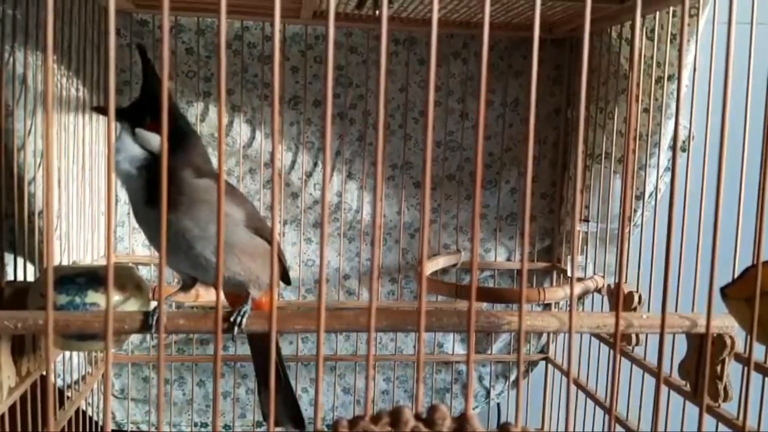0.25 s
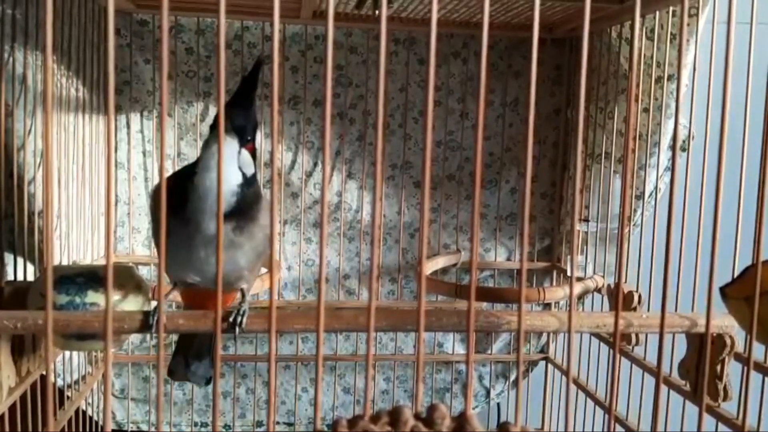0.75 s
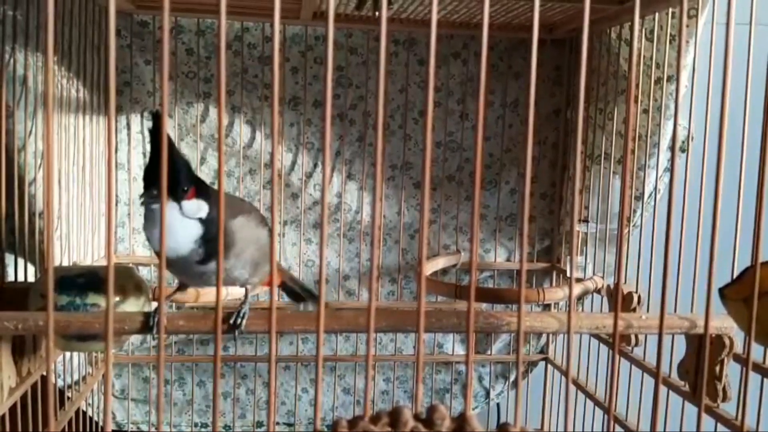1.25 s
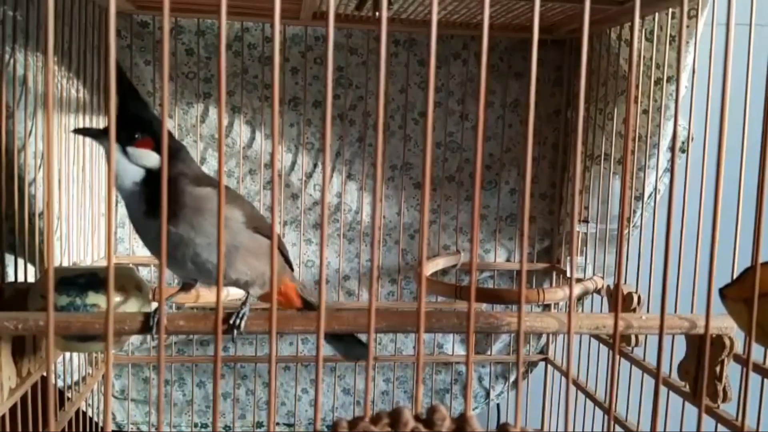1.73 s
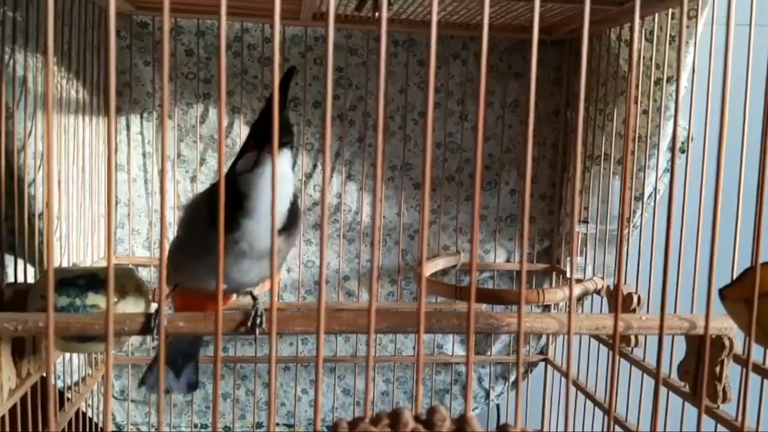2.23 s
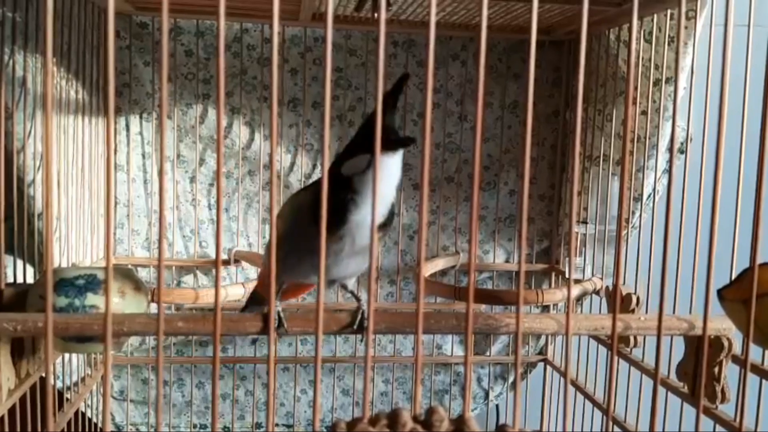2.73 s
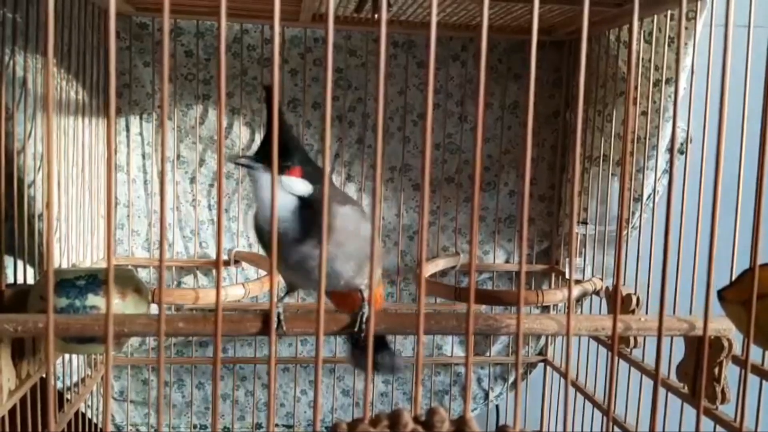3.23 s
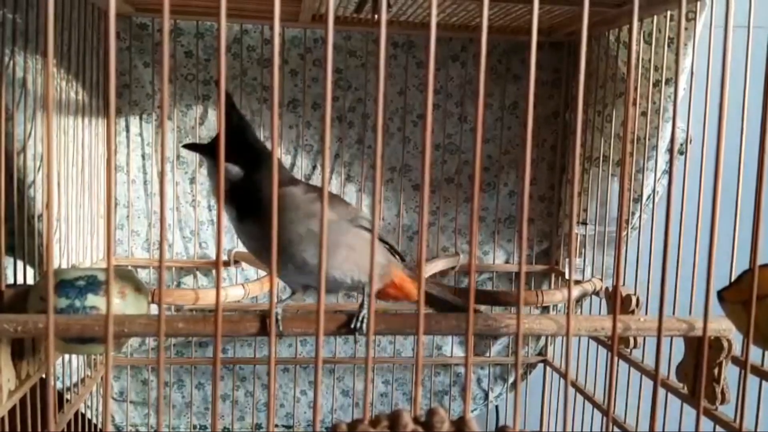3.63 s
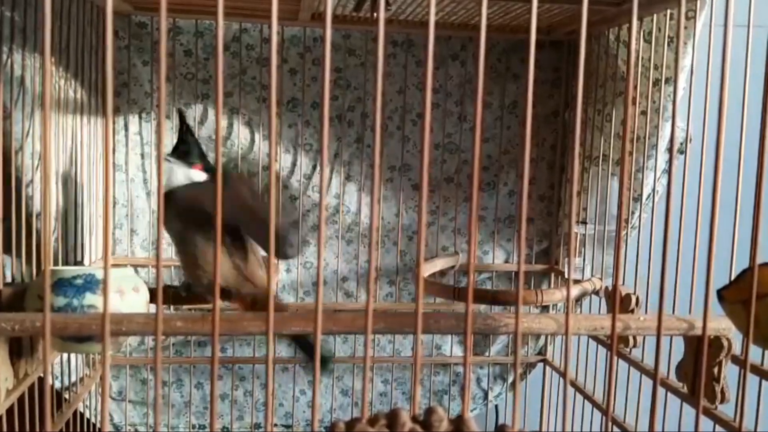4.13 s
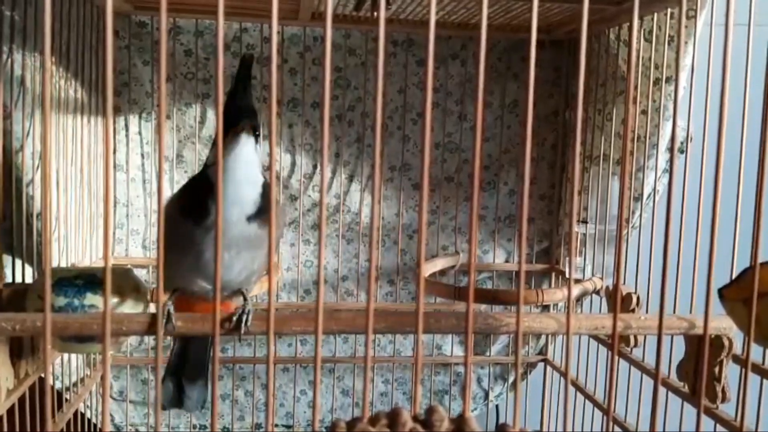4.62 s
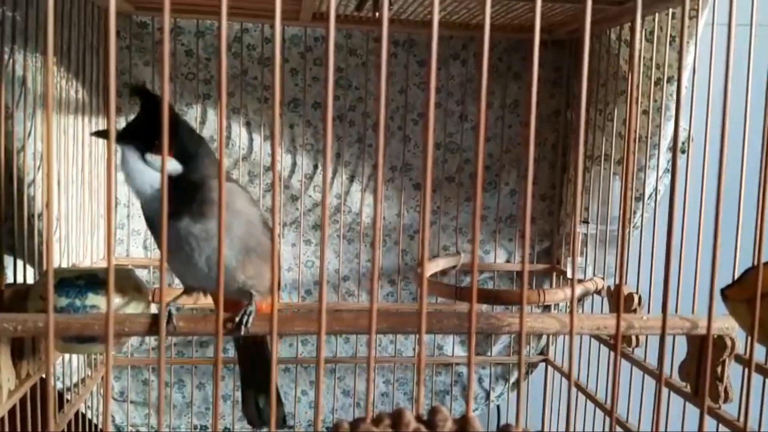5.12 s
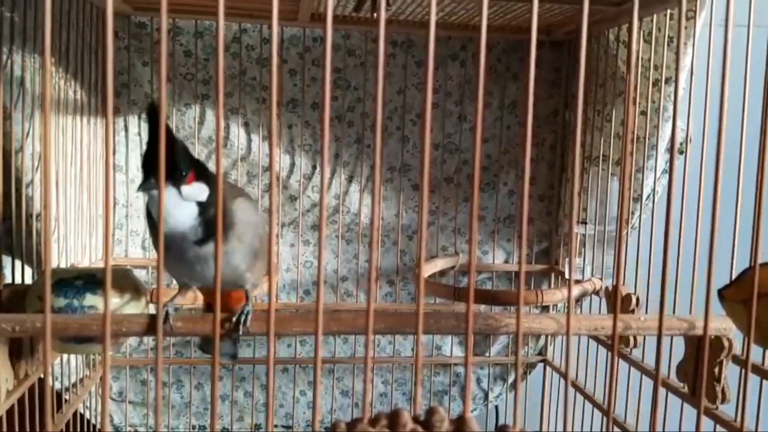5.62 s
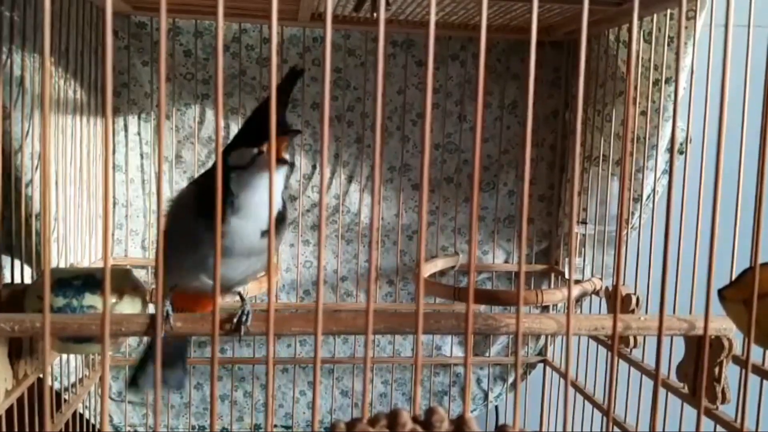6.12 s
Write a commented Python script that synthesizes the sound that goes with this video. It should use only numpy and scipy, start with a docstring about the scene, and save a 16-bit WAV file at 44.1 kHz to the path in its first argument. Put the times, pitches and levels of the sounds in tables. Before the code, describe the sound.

Inside a hard-walled room, a caged bulbul sings close to the microphone, slightly right of centre. It starts immediately with a loud, clipped note, a buzzy rising whit and weaker falling notes until 0.3 s. Faint distant chirps follow at 0.5-1.05 s. A smooth hooked call, stepping up and plunging, comes at 1.3 s, with soft feather rustles and dull far sounds around it. At 1.95-2.45 s a loud whit leads into a quick descending warble; another hooked call sounds at 3.0 s. From 3.5 to 4.45 s distant birds chirp busily, with two hoarse chucks and short wing flutters near 3.8-4.2 s. A strong whit at 4.55 s opens a rapid tumbling phrase lasting to 5.1 s. Sparse faint chirps follow, then bright whistles at 5.9 s, a whit at 6.15 s and a last note at 6.3 s. Echoes and narrow ringing trail each phrase over quiet room noise, low hum and hiss.

```python
"""In a hard-walled room, a red-whiskered bulbul sings short, loud phrases in a cage close to the microphone.
Its notes are gliding whistles with weak overtones, some with a fast buzz; wall echoes, a dense tail and narrow
resonances ring on after them. Other birds answer from further off with small chirps and hoarse chucks, heard
largely through the room. Wings and feet make grainy puffs of noise, and far sounds are dull, dying bands of noise.
Below lie room noise, a wavering low hum, a thin high tone and a treble hiss."""
import sys
import numpy as np
from scipy import signal
from scipy.fft import rfft, irfft
from scipy.io import wavfile
from scipy.ndimage import uniform_filter1d, minimum_filter1d

SR = 44100
rng = np.random.default_rng(int(sys.argv[2]) if len(sys.argv) > 2 else 0)


def generate_wav(sig):
    """Save sig (samples, or channels by samples) to the path in sys.argv[1] as 16-bit PCM at SR."""
    pcm = np.round(np.clip(np.atleast_2d(sig).T, -1, 1) * 32767).astype(np.int16)
    wavfile.write(sys.argv[1], SR, pcm)


N = 280476

# Room noise colour: [f/Hz, relative level per Hz/dB]
ROOM_NOISE_COLOUR = [(25, -19), (60, -9.5), (120, -5.5), (170, -6.5), (220, -21.5), (330, -7), (800, -18.5),
                     (1500, -18), (3300, -13.5), (5500, -21), (8000, -30.5)]
# Room noise loudness: [t/s, level/dB]
ROOM_NOISE_LEVEL = [(0, -52), (.7, -61.5), (1.5, -54.5), (2.5, -61), (3.9, -57), (5.3, -60.5),
                    (6.36, -62.5)]
# Treble hiss colour: [f/Hz, relative level per Hz/dB]
TREBLE_HISS_COLOUR = [(7500, -31.5), (9500, -20.5), (10800, 13), (11800, 3), (13000, -12.5), (16000, -23.5)]
# Low hum, before it wavers: [t/s, level/dB]
HUM_LEVEL = [(0, -73.5), (2.4, -77), (2.8, -68), (5.2, -71.5), (5.7, -64), (6.36, -63)]
# Thin high tone, before it flickers: [t/s, peak level/dB]
WHINE_LEVEL = [(0, -53), (.6, -61.5), (1.2, -76), (1.6, -58), (2.5, -65.5), (2.95, -57.5), (3.15, -80.5),
               (6.36, -84)]
# Held notes of the warble: [t/s, length/s, start f/Hz, end f/Hz, source level/dB, swell over the note/dB,
# scoop up into it/s, drop out of it/s]
HELD_NOTES = [ (0, .019, 2320, 2382, -6.5, -17.5, 0.0028, 0.0011),
              (0.121, 0.031, 2034, 1898, -23.5, 13, 0.00074, 0.0017),
              (0.158, 0.021, 1612, 1738, -29.5, -9, .009, 0.0047),
              (0.231, 0.066, 1550, 1404, -31.5, -9, 0.0022, 0.00088),
              (2.286, 0.021, 3086, 2907, -12, 3, 0.0012, 0), (2.308, 0.016, 2687, 2585, -14.5, 3, 0, 0),
              (2.329, .024, 1998, 1954, -17.5, 2, 0, 0.00024),
              (2.407, 0.045, 1689, 1512, -25, -6, 0.0032, 0.0018),
              (4.918, .023, 2690, 2727, -17.5, 15.5, 0.017, 0),
              (4.938, 0.017, 3200, 3075, -5, -1.5, 0, 0.0022),
              (5.005, 0.027, 1668, 1700, -24, 3.5, 0.018, 0.00028),
              (5.031, 0.039, 2382, 2699, -19, 6.5, 0.0017, 0),
              (5.065, .017, 2396, 2358, -15, 10, 0.00073, 0), (5.087, 0.021, 1862, 1685, -22.5, -8.5, 0, 0),
              (5.107, 0.012, 2107, 1995, -26, 4, 0, 0.001), (5.921, 0.024, 2036, 1957, -22, 2.5, .012, 0),
              (5.947, .025, 2987, 2932, -10, 1.5, 0.00071, 0),
              (5.974, 0.038, 2650, 2604, -12, -1.5, 0.00018, 0.022),
              (6.303, 0.0626, 2260, 2394, -12.5, 3.5, 0.0077, 0.0072)]
# Buzzing notes of the warble: [t/s, length/s, start f/Hz, end f/Hz, source level/dB, swell/dB,
# buzz rate/Hz, buzz depth/share of pitch, loudness pulsing/0-1]
BUZZING_NOTES = [(0.184, 0.061, 2168, 2337, -28, -18, 103, 0.061, 0.33),
                 (2.151, .041, 1907, 1595, -22, 3, 203, 0.049, 0.63),
                 (2.195, .044, 2140, 2110, -14.5, 3, 85, 0.049, 0.22),
                 (2.351, 0.05, 2223, 2110, -21, 7, 110, 0.034, 0.49),
                 (4.79, 0.036, 1809, 1944, -19.5, 10, 168, 0.068, 0.9),
                 (4.833, 0.039, 2071, 2261, -15.5, -3, 71.6, 0.014, .89)]
# Loud rising "whit" calls: [t/s, length/s, start f/Hz, top f/Hz, rise/s, source level/dB, attack/s,
# buzz rate/Hz, buzz depth/share of pitch]
WHIT_CALLS = [(.033, 0.044, 1433, 3061, 0.027, -16.5, 0.004, 217, 0.058),
              (1.966, .053, 1792, 2994, .034, -9, 0.0065, 122, 0.067),
              (4.563, .067, 1528, 3197, .045, -9.5, 0.0091, 132, 0.083),
              (6.157, 0.051, 2495, 3274, 0.022, -7.5, 0.004, 94.4, 0.067)]
# Shape of the hooked call, which steps up, arches, dips and plunges:
# [t into the call/s, f before scaling/Hz, level before gain/dB]
HOOK_SHAPE = [(0, 1188, -42.5), (.012, 1736, -27.5), (.027, 1653, -27.5), (.033, 2110, -19),
              (0.046, 2243, -20.5), (.054, 2097, -14), (.063, 1770, -23), (.083, 1980, -25),
              (.095, 1870, -17), (.111, 901.3, -40)]
# Each hooked call: [t/s, pitch factor/ratio, gain/dB]
HOOK_CALLS = [(1.277, 0.98, 0.94), (2.980, 0.97, -2)]
# Overtones of every bird: [multiple of the pitch/ratio, relative level/dB]
OVERTONE_LEVELS = [(2, -39.5), (3, -37.5), (4, -55), (5, -43.5), (6, -42.5)]
# How throat and beak colour the overtones: [f/Hz, gain/dB]
BEAK_COLOUR = [(2300, 32.5), (3000, 9), (3700, -4.5), (6000, -6.5), (8200, -29), (10500, 2), (12300, 2),
               (15000, -16.5)]
# Colour of the hiss in the song: [f/Hz, relative level per Hz/dB]
SONG_HISS_COLOUR = [(400, -7), (1200, 7), (3000, 7.5), (4500, 7), (6300, 0.5), (8300, -9.5), (10500, -3.5),
                    (12500, 0.5), (15500, -13.5)]
# Echoes from near walls: [delay to left port/ms, delay to right port/ms, relative level/dB]
WALL_ECHOES = [(1.786, 1.913, -13), (4.2, 4.4, -11.5), (7.905, 7.6, -12.5), (12.42, 12.9, -12),
               (20.86, 24, -19.5)]
# Time for the room to fade by 60 dB: [f/Hz, fade time/s]
ROOM_FADE = [(300, .5), (1200, 0.23), (2000, 0.66), (3200, 0.63), (6000, 0.48), (14000, 0.39)]
# Narrow resonances of cage and room: [f/Hz, width/Hz, relative level/dB]
RESONANCES = [(1617, 6.2, -21.5), (2007, 8.2, -15), (2356, 12, -24), (2517, 9.9, -15.5), (2540, 35, -11.5),
              (3022, 8.59, -11.5), (2990, 4, -14.5), (3487, 10, -14)]
# Birds further off: [t/s, length/s, start f/Hz, end f/Hz, source level/dB]
FAR_CHIRPS = [ (.530, 0.027, 3150, 3270, -54.5), (.700, 0.067, 3080, 3490, -49.5),
              (.720, 0.028, 4520, 4770, -56.5), (.846, 0.04506, 4026, 4110, -37.5),
              (.945, 0.02, 2660, 2500, -53.5), (.960, 0.052, 3330, 3216, -39),
              (.995, 0.058, 3700, 3354, -38.5), (1.472, 0.027, 3375, 3020, -39.5),
              (1.555, .060, 2850, 2512, -46), (1.680, 0.063, 2545, 2260, -49.5),
              (2.540, 0.049, 4020, 3830, -49.5), (3.230, .129, 3415, 3505, -58),
              (3.350, 0.049, 1953, 2064, -56.5), (3.540, 0.037, 3560, 3167, -33.5),
              (3.545, 0.059, 3310, 2922, -34.5), (3.595, 0.052, 1870, 2690, -48),
              (3.632, .043, 3575, 3110, -47), (3.660, 0.051, 2910, 2410, -37),
              (3.705, 0.034, 3130, 3198, -30), (3.808, 0.05, 2530, 2397, -37),
              (3.976, 0.043, 2485, 2900, -38.5), (4.012, 0.015, 3620, 3460, -45.5),
              (4.066, 0.037, 3346, 3260, -36.5), (4.135, 0.051, 2554, 2350, -43),
              (4.172, 0.054, 2470, 2530, -36), (4.385, .047, 2590, 2410, -40.5),
              (4.418, .028, 2345, 2510, -36), (5.362, 0.032, 2743, 3644, -41.5),
              (5.490, .1, 1875, 1325, -56.5), (5.520, 0.043, 3450, 2760, -49.5),
              (5.525, .025, 4730, 4480, -58.5), (5.650, 0.034, 3355, 2856, -47.5),
              (5.725, .028, 2670, 3360, -49.5), (5.730, 0.24, 3730, 3690, -59.5),
              (5.738, 0.019, 4566, 4610, -43)]
# Dull sounds far away: [t/s, fade scale/s, centre f/Hz, width/Hz, starting level/dB]
FAR_SOUNDS = [(0.931, 0.29, 790, 157.6, -57), (1.325, 0.35, 967, 70.5, -43.5),
              (1.33, 0.32, 800, 106.6, -46), (1.544, 0.61, 301.3, 110.1, -51.5),
              (2.545, 0.84, 309, 91, -60.5), (6.089, 0.3, 794, 132.8, -41.5), (6.097, 0.28, 560, 143, -43),
              (6.229, 0.17, 547, 93.7, -41)]
# Wings and feet: [t/s, length scale/s, level/dB]; each puff peaks half a length after t
PUFFS = [(1.396, 0.24, -50), (1.772, 0.32, -53), (3.76, 0.074, -52), (3.812, 0.052, -58),
         (3.892, 0.055, -53.5), (4.153, 0.21, -56), (4.207, 0.059, -49.5)]
# Colour of the feather noise: [f/Hz, relative level per Hz/dB]
FEATHER_COLOUR = [(150, -12), (500, 9.5), (1500, 4), (5000, 4.5), (8000, -12), (11000, 0), (15000, -12.5)]
# Short, hoarse, low chucks: [t/s, length/s, start f/Hz, end f/Hz, source level/dB, octave above relative to it/dB]
FAR_CHUCKS = [(3.882, 0.03, 1592, 1467, -35, -14.5), (4.282, 0.035, 1591, 1616, -32, 2)]

TIME = np.arange(N) / SR
CUTOFF_HZ = 15800
# A scoop starts at this pitch and this far down; rises flatten towards the top
REST_HZ, SCOOP_DB, RISE_SHAPE = 1085, 19.5, 1.4
DROP_OCTAVES_PER_S, DROP_DB_PER_S = 67, 1898
# A slight buzz in the plain whistles; hooked calls share its rate
QUIVER_PER_S, QUIVER_DEPTH, QUIVER_PULSING = 104, .012, .08
# A whit starts this far down; its buzz swings the loudness by this share
WHIT_ONSET_DB, WHIT_PULSING = 29, 0.32
SLUR_S = .004     # the voice needs this long to start, stop or step to the next note
ATTACK_S = .004   # after a rest the voice builds up with this time constant


def from_db(db):
    """Turns decibels into a plain multiplier."""
    return 10 ** (np.asarray(db) / 20)


def rms_one(x):
    """Scales a sound to an average (rms) level of 1."""
    return x / np.sqrt(np.mean(x ** 2) + 1e-20)


def in_time(rows):
    """Reads a (t/s, value) curve at every sample."""
    return np.interp(TIME, *np.transpose(rows))


def at_hz(points, hz):
    """Reads a (f/Hz, value) table on a log-frequency axis."""
    f, value = np.transpose(points)
    return np.interp(np.log(np.maximum(hz, 1)), np.log(f), value)


def drift(rate, size):
    """Wanders about zero by joining random points, rate of them per second, with straight lines."""
    knots = rng.standard_normal(8192)
    return np.interp(np.arange(size) / SR * rate, np.arange(len(knots)), knots)


def add(out, s, sound):
    """Mixes a sound in from time s on."""
    start = max(int(s * SR), 0)
    part = sound[..., :max(N - start, 0)]
    out[..., start:start + part.shape[-1]] += part


def clock(length):
    """Seconds since the start of a note."""
    return np.arange(int(length * SR)) / SR


def noise(colour, alike_below_hz):
    """Stereo noise of a given colour, alike on both sides in the bass; rms 1."""
    hz = np.fft.rfftfreq(N, 1 / SR)
    mid, side = rfft(rng.standard_normal((2, N)))
    alike = 1 / (1 + (hz / alike_below_hz) ** 2)
    opposite = side * np.array([[1], [-1]])
    pair = np.sqrt(1 + alike) * mid + np.sqrt(1 - alike) * opposite
    return rms_one(irfft(pair * from_db(at_hz(colour, hz)), N))


def background(hiss_db=-69, hum_hz=140, whine_hz=4090):
    """Room noise, a wavering low hum, a flickering thin high tone and a narrow treble hiss."""
    rumble = from_db(in_time(ROOM_NOISE_LEVEL)) * noise(ROOM_NOISE_COLOUR, alike_below_hz=1100)
    hum_level = np.sqrt(2) * from_db(in_time(HUM_LEVEL) + 2.0 * drift(5.4, N))
    hum = hum_level * np.sin(2 * np.pi * hum_hz * TIME + 0.72 * drift(27, N))
    whine_level = from_db(in_time(WHINE_LEVEL) + 3.5 * drift(60, N))
    whine = whine_level * np.sin(2 * np.pi * whine_hz * TIME + 2.5 * drift(60, N))
    hiss = from_db(hiss_db) * noise(TREBLE_HISS_COLOUR, alike_below_hz=4600)
    return rumble + hum + whine + hiss


def note(hz, db, buzz_rate, depth, pulsing):
    """The controls of one note (gate, pitch, level, pitch swing); a buzz swings pitch and loudness together."""
    size = len(hz)
    buzz = -np.cos(2 * np.pi * buzz_rate * np.arange(size) / SR + 0.14 * drift(60, size))
    level = from_db(db) * (1 + pulsing * buzz)
    return np.array([np.ones(size), hz, level, depth * buzz])


def still_to_rise(t, rise_s):
    """The share of an upward sweep that is left at time t."""
    return np.clip(1 - (t + 1 / SR) / max(rise_s, 1 / SR), 0, 1) ** RISE_SHAPE


def warble():
    """Straight glides, plain or buzzing; the voice is weaker while it scoops up to a note or drops off it."""
    for s, length, start_hz, end_hz, db, swell_db, scoop_s, drop_s in HELD_NOTES:
        t = clock(length)
        hz = start_hz + (end_hz - start_hz) * t / length
        below = still_to_rise(t, scoop_s)
        dropped_s = np.maximum(t - length + drop_s, 0)
        hz = (hz + (REST_HZ - hz) * below) * 2 ** (-DROP_OCTAVES_PER_S * dropped_s)
        level_db = db + swell_db * (t / length - .5) - SCOOP_DB * below - DROP_DB_PER_S * dropped_s
        yield s, note(hz, level_db, QUIVER_PER_S, QUIVER_DEPTH, QUIVER_PULSING)
    for s, length, start_hz, end_hz, db, swell_db, *buzz in BUZZING_NOTES:
        u = clock(length) / length
        yield s, note(start_hz + (end_hz - start_hz) * u, db + swell_db * (u - .5), *buzz)


def whistle(hz, level, overtone_db):
    """The syrinx (a bird's voice box) gives an almost pure tone; throat and beak colour its weak overtones."""
    phase = 2 * np.pi * np.cumsum(hz) / SR
    tone = np.sin(phase)
    for k, db in OVERTONE_LEVELS:
        overtone_level = from_db(db + overtone_db + at_hz(BEAK_COLOUR, k * hz))
        tone += overtone_level * (k * hz < CUTOFF_HZ) * np.sin(k * phase)
    return np.sqrt(2) * level * tone


def slurred(x):
    """A control smoothed over the time that the voice needs to move."""
    window = np.sin(np.pi * np.arange(1, SLUR_S * SR) / (SLUR_S * SR))
    return np.convolve(x, window / window.sum(), "same")


def bulbul(jitter=0.008, overtone_db=8.0, slur_db=8.5, slur_octaves_per_s=60):
    """One voice sings all the notes, sliding from one to the next where they touch."""
    controls = np.zeros((4, N))
    for s, controls_of_note in [*warble(), *whits(), *hooks()]:
        add(controls, s, controls_of_note)
    # where notes overlap, their controls are averaged
    gate, hz, level, swing = controls / np.maximum(controls[0], 1)
    gate = slurred(gate)
    glide = (slurred(hz) + 1e-9 * REST_HZ) / (gate + 1e-9)
    pitch = glide * (1 + swing + jitter * drift(700, N))
    keep = np.exp(-1 / (ATTACK_S * SR))
    pressure = signal.lfilter([1 - keep], [1, -keep], (gate > .1) + 1e-18)
    shimmer = from_db(1.8 * drift(300, N))
    level = pressure * slurred(level) * shimmer
    # in a steep downward slur the throat lags behind the pitch and lets more overtones through
    fall_octaves_per_s = -np.gradient(np.log2(glide)) * SR * (gate > .5)
    falling = np.clip(uniform_filter1d(fall_octaves_per_s, size=200) / slur_octaves_per_s, 0, 1)
    out, sounding = np.zeros(N), level > 0
    out[sounding] = whistle(pitch[sounding], level[sounding], overtone_db + slur_db * falling[sounding])
    return out


def near_field(x, echo_db):
    """The direct sound and the first wall echoes, which reach the two ports at different moments."""
    def late(samples):
        return np.interp(np.arange(N) - round(samples), np.arange(N), x, left=0)

    out = np.array([x, late(1)])
    for left_ms, right_ms, db in WALL_ECHOES:
        echo = np.array([late(left_ms * SR / 1000), late(right_ms * SR / 1000)])
        out += from_db(db + echo_db) * echo
    return out


def room_tail(x, alike=0.1, build_s=0.0059):
    """Dense reflections, dying at their own pace in each band and partly alike in both channels."""
    t = np.arange(SR) / SR
    white = rng.standard_normal((3, SR))
    spectrum = rfft(np.sqrt(1 - alike) * white[:2] + np.sqrt(alike) * white[2])
    hz = np.fft.rfftfreq(SR, 1 / SR)
    response = np.zeros((2, SR))
    edges = np.geomspace(200, 20000, 13)
    for low, high in zip(edges, edges[1:]):
        t60 = at_hz(ROOM_FADE, np.sqrt(low * high))
        band = irfft(spectrum * (hz >= low) * (hz < high), SR)
        response += band * np.exp(-np.log(1000) * t / t60)
    response *= 1 - np.exp(-t / build_s)
    response /= np.sqrt(np.sum(response ** 2) / 2)
    return signal.fftconvolve(x[None], response, axes=1)[:, :N]


def ringing(x):
    """A note that crosses a narrow resonance leaves it sounding, with its own strength at each port."""
    out = np.zeros((2, N))
    for hz, width_hz, db in RESONANCES:
        r = np.exp(-np.pi * width_hz / SR)   # what is left after one sample
        feed = (1 - r * r) / 2 * np.array([1, 0, -1])
        feedback = [1, -2 * r * np.cos(2 * np.pi * hz / SR), r * r]
        ring = signal.lfilter(feed, feedback, x + 1e-18)
        out += from_db(db + 11.5 + rng.normal(0, 1, (2, 1))) * ring
    return out


def song_hiss(near, air_db):
    """A faint hiss that swells with the song and its ringing, but less steeply."""
    loudness = np.sqrt(np.maximum(uniform_filter1d(near ** 2, size=600, axis=1), 0))
    return from_db(air_db) * loudness ** 0.65 * noise(SONG_HISS_COLOUR, alike_below_hz=4500)


def whits():
    """A whit sweeps up to its top pitch, swelling fast, with a buzz throughout."""
    for s, length, start_hz, top_hz, rise_s, db, attack_s, buzz_rate, depth in WHIT_CALLS:
        t = clock(length)
        hz = top_hz + (start_hz - top_hz) * still_to_rise(t, rise_s)
        level_db = db - WHIT_ONSET_DB * np.exp(-t / attack_s)
        yield s, note(hz, level_db, buzz_rate, depth, WHIT_PULSING)


def chirps(rows, rough, overtone_db):
    """Short glides that swell and fade, their pitch shaking by the share rough."""
    out = np.zeros(N)
    for s, length, start_hz, end_hz, db in rows:
        u = np.linspace(0, 1, int(length * SR))
        pitch = (start_hz + (end_hz - start_hz) * u) * (1 + rough * drift(600, len(u)))
        level = from_db(db) * np.sqrt(4 * u * (1 - u))
        add(out, s, whistle(pitch, level, overtone_db))
    return out


def distant(rise_s=0.011, fade_db=16):
    """Far sounds arrive as blurred narrow resonances: bands of noise that die away."""
    out = np.zeros((2, N))
    t = np.arange(SR) / SR
    for s, length, hz, width_hz, db in FAR_SOUNDS:
        edges_hz = [hz - width_hz / 2, hz + width_hz / 2]
        band = signal.butter(2, edges_hz, "band", fs=SR, output="sos")
        white = rng.standard_normal((3, SR))
        ring = rms_one(signal.sosfilt(band, white[:2] + white[2]))   # partly alike on both sides
        add(out, s, ring * np.minimum(t / rise_s, 1) * from_db(db - fade_db * t / length))
    return out


def hooks(depth=0.0021, pulsing=0.11):
    """The same smooth hooked call each time, with its own pitch factor and gain."""
    at, hz, db = np.transpose(HOOK_SHAPE)
    t = clock(at[-1])
    for s, factor, gain_db in HOOK_CALLS:
        call_hz = factor * np.interp(t, at, hz)
        call_db = gain_db + np.interp(t, at, db)
        yield s, note(call_hz, call_db, QUIVER_PER_S, depth, pulsing)


def flutter():
    """Wings and feet: soft, grainy puffs of feather noise that rise and fall."""
    level = np.zeros(N)
    for s, length, db in PUFFS:
        level += from_db(db) * np.exp(-np.abs(2 * (TIME - s) / length - 1))
    grain = from_db(2.5 * drift(210, N))
    return level * grain * noise(FEATHER_COLOUR, alike_below_hz=950)


def chucks(rough=0.13, octave_rough=0.028, overtone_db=0.0):
    """A chuck is a shaky low note with a steadier one an octave above it."""
    lows, octaves = [], []
    for s, length, start_hz, end_hz, db, octave_db in FAR_CHUCKS:
        lows.append((s, length, start_hz, end_hz, db))
        octaves.append((s, length, 2 * start_hz, 2 * end_hz, db + octave_db))
    return chirps(lows, rough, overtone_db) + chirps(octaves, octave_rough, overtone_db)


def scene(air_db=-38, song_db=-1.0, song_room_db=-11.5, far_direct_db=-1.5, far_room_db=-7.5,
          song_pan_db=1.7, far_ring_db=5.0):
    """The near singer sits a little to the right; the far birds are heard largely through the room."""
    song = bulbul()
    side_db = np.array([[-song_pan_db], [song_pan_db]])   # left, right
    near = near_field(song, echo_db=2.5) * from_db(song_db + side_db)
    near += from_db(song_room_db) * room_tail(song) + ringing(song)
    others = chirps(FAR_CHIRPS, rough=.031, overtone_db=-2.5) + chucks()
    far = from_db(far_direct_db) * near_field(others, echo_db=6.0)
    far += from_db(far_room_db) * room_tail(others) + from_db(far_ring_db) * ringing(others)
    return near + song_hiss(near, air_db) + far + distant() + flutter() + background()


def record(dry):
    """The loudest peaks are held down by a fast limiter, and the top is cut."""
    loudest_side = np.abs(dry).max(axis=0)
    peak = -minimum_filter1d(-loudest_side, size=180)   # the highest value nearby
    gain = uniform_filter1d(np.minimum(1, .94 / (peak + 1e-9)), size=180)
    top_cut = signal.cheby2(16, 70, CUTOFF_HZ + 600, fs=SR, output="sos")
    return signal.sosfilt(top_cut, dry * gain)


dry = scene()
out = record(dry)
generate_wav(out)
```